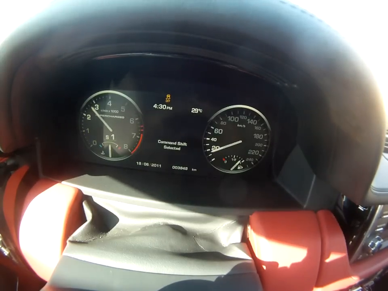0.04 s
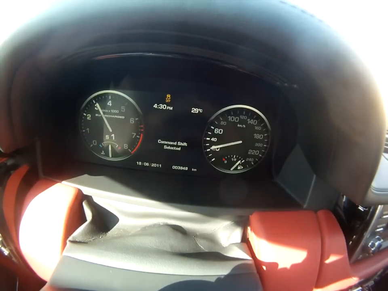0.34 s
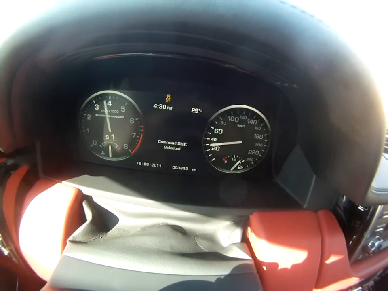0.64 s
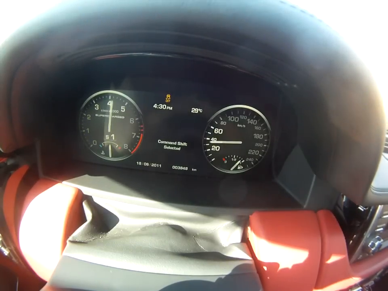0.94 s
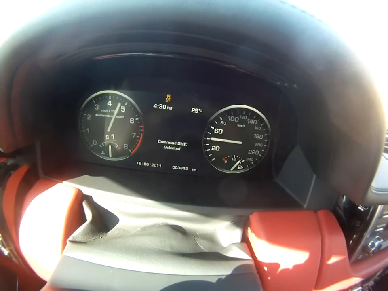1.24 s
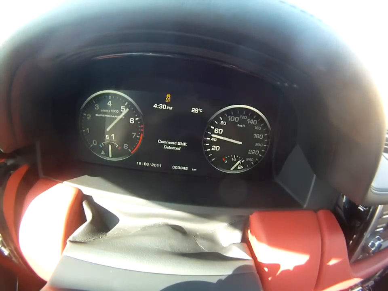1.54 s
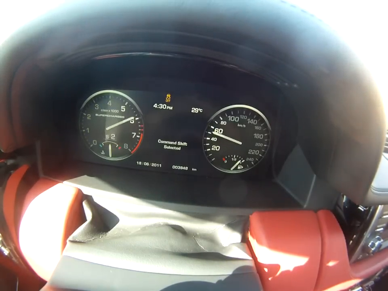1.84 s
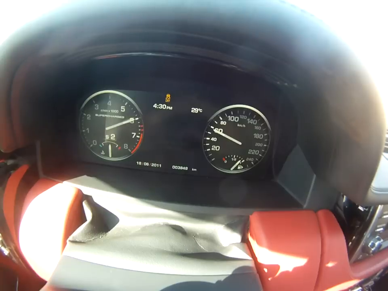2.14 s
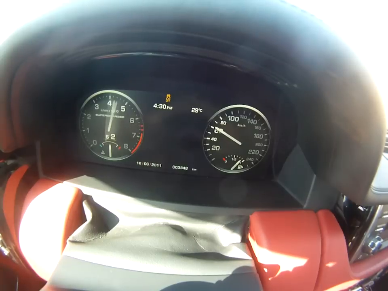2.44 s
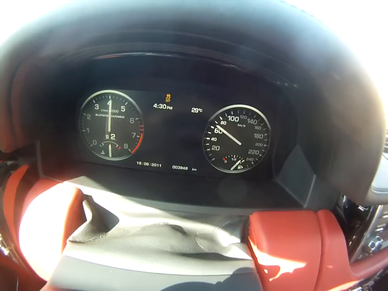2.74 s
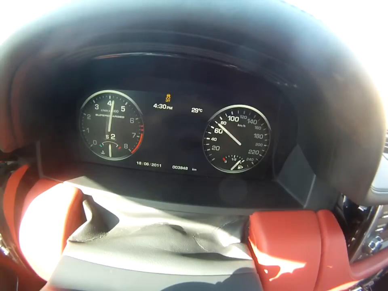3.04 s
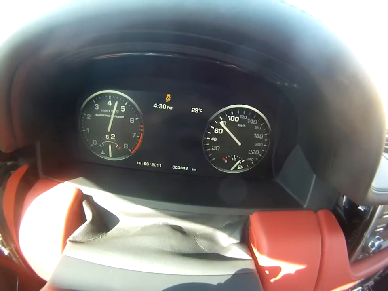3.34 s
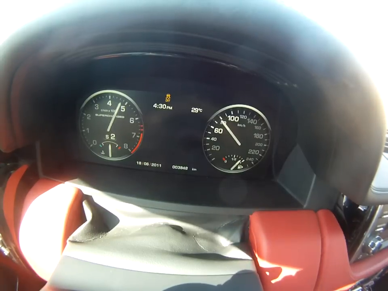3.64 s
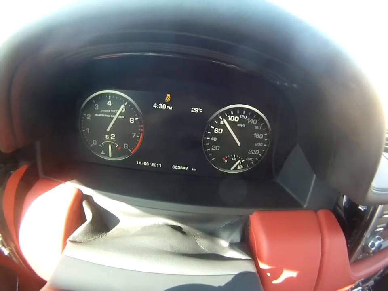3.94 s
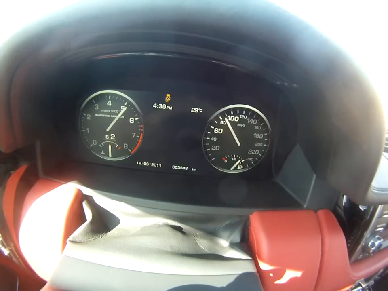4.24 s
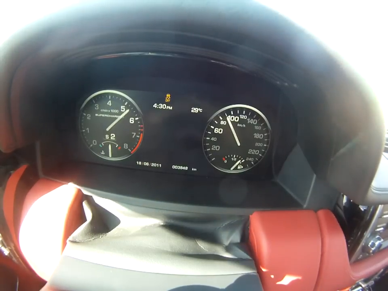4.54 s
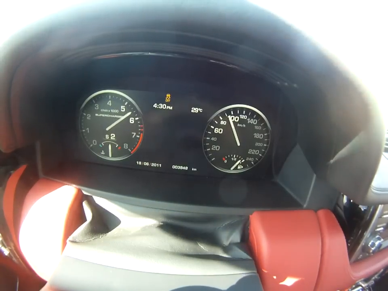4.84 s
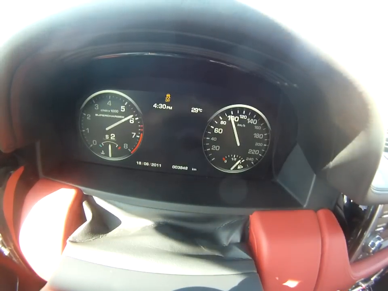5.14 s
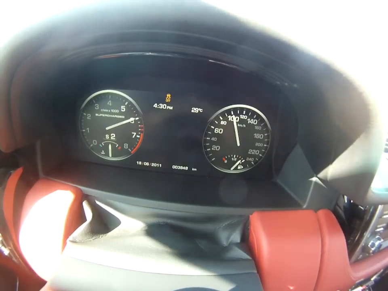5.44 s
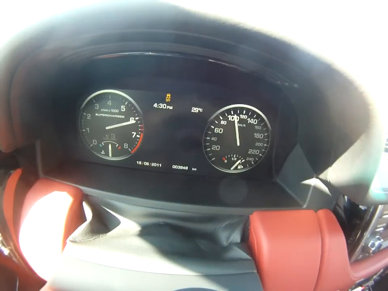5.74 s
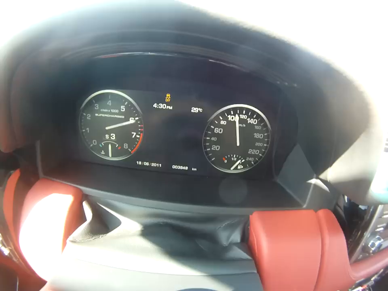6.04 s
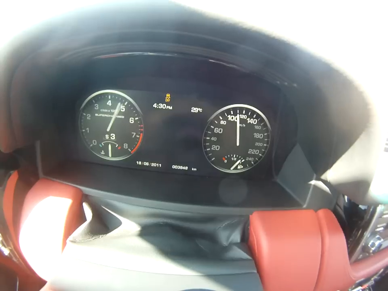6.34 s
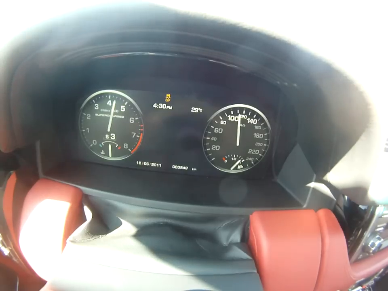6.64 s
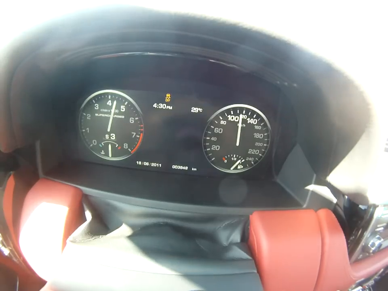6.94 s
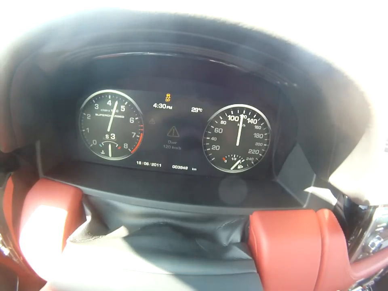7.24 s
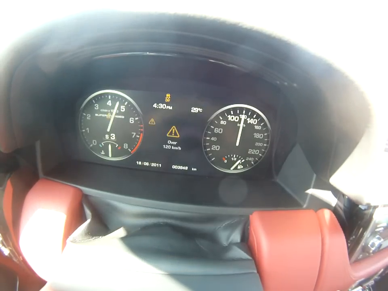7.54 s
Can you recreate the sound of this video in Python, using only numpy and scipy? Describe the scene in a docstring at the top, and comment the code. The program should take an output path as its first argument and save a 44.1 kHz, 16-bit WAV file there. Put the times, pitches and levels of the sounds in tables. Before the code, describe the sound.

A V8 car accelerates flat out through two upshifts, heard from the cabin over road rumble, rushing air and rattling trim.

```python
"""A V8 roars up through first, second and third gear, flat out, heard from the driver's seat.
Its orders (multiples of the four-stroke cycle rate) sweep through the cabin's resonances and howl,
over rushing air and road rumble. Trim rattles at the first upshift, the driveline thumps at the second,
and two bumps jolt the body near the end. A small camera's coarse sample clock adds a high sizzle."""
import sys
import numpy as np
from scipy import signal
from scipy.fft import rfft, irfft, next_fast_len
from scipy.io import wavfile
from scipy.ndimage import uniform_filter1d, map_coordinates

SR = 44100
rng = np.random.default_rng(int(sys.argv[2]) if len(sys.argv) > 2 else 0)


def store_pcm(level_fs):
    """Save levels as 16-bit WAV."""
    pcm = np.round(np.clip(level_fs, -1, 1) * 32767).astype(np.int16)
    wavfile.write(sys.argv[1], SR, np.atleast_2d(pcm).T)


N = 340011

# engine speed through three gears, in four-stroke cycles a second: time_s, cycle_hz
ENGINE_SPEED = [(0, 24.49), (.12, 25.43), (.5, 31.77), (1, 39.02), (1.5, 47.26), (1.75, 50.77),
                (1.95, 50.8), (2.22, 33.63), (2.32, 33), (3, 36.47), (4.4, 45.52), (5.62, 51.98),
                (5.86, 52.33), (6.15, 35.96), (6.5, 35.93), (7, 37.5), (7.71, 39.28)]
# the car gathering pace: time_s, speed_kmh
ROAD_SPEED = [(0, 38), (2, 39.5), (6, 98.7), (7.7, 128.5)]
# torque is held back and the car lurches: start_s, hold_s, torque_drop_db, drone_swell_db
UPSHIFT_DIPS = [(1.898, 0.25, 11.5, 7), (5.822, 0.4, 10, 2)]
# the firing note and two overtones, away from the cabin's modes: order, level_db
FIRING_ORDERS = [(8, -34), (16, -47.5), (20, -52)]
# uneven exhaust pulses favour some orders: order, gain_db
EXHAUST_PATTERN = [(2, 6.5), (3, 0.5), (4, 2.5), (5, 2.5), (6, -5), (7, -3.5), (9, -3), (10, 2), (11, 4),
                   (12, -0.5), (13, 4.5), (15, -0.5), (17, -1.5), (19, 4.5), (22, -1), (23, -1.5),
                   (24, 2.5), (25, -3.5), (27, 3.5), (28, 7), (29, 1.5), (30, 0.5), (31, -11.5), (32, 1),
                   (34, -2), (36, 6.5), (39, -4), (40, 3), (41, -1), (47, -5.5), (48, 0.5), (50, -11.5),
                   (53, -2), (55, -8.5), (56, 7)]
# tone of the path from engine to cabin: frequency_hz, gain_db
CABIN_PATH = [(60, -39), (100, -36), (130, -30), (150, -31.5), (175, -28.5), (200, -36), (245, -35),
              (285, -28.5), (320, -28.5), (350, -35.5), (400, -37), (500, -43), (565, -49.5), (630, -43.5),
              (700, -54), (780, -47), (850, -55), (1010, -57), (1230, -65.5), (1310, -63.5), (1430, -66),
              (1640, -61.5), (1920, -68), (2150, -68), (2650, -66.5), (3100, -73.5)]
# an order howls as it meets a cabin mode: order, mode_hz, width_hz, level_db
CABIN_HOWLS = [(5, 220, 36, -27.5), (6, 276, 12.16, -25), (6, 307, 9.1, -27), (7, 300, 36, -28),
               (8, 290, 26, -23), (8, 335, 11, -16), (8, 384, 13, -20), (8, 411, 12, -23),
               (9, 295, 27, -28), (10, 390, 15, -28), (12, 422.6, 24, -31), (12, 488, 21, -30),
               (12, 595, 14, -35), (13, 524.6, 27, -29.5), (13, 645, 19, -31.5), (14, 645, 26, -38),
               (15, 687, 55, -41.5), (15, 762, 18, -38.5), (16, 440, 150, -36.5), (16, 636, 33.3, -31.5),
               (18, 776, 36, -37), (20, 815, 90, -39), (20, 972, 24, -39), (20, 1020, 36, -36),
               (24, 880, 80, -42.5), (28, 1165, 30, -46)]
# swell and ebb of the cabin's boom: time_s, gain_db
BOOM_ENVELOPE = [(0.1, -22.9), (0.6, -20.1), (1.3, -21.2), (1.75, -18.5), (2.1, -28.1), (2.4, -23.6),
                 (3.1, -21.6), (3.5, -20.3), (3.75, -25.9), (4.3, -21.6), (4.8, -19.1), (5.5, -24.6),
                 (6.75, -26.7), (7.25, -21.3), (7.6, -25.6)]
# road roughness, felt as body shake: time_s, level_db
ROAD_ROUGHNESS = [(0, -28), (.4, -20), (1.6, -21), (2.6, -21), (3.3, -23), (4.4, -22.5), (5.3, -18.5),
                  (6, -23.5), (7.7, -22)]
# low-mid roar of rushing gas: frequency_hz, gain_db
ROAR_COLOUR = [(40, -120), (140, -8), (200, 0), (300, -2.5), (410, -4), (520, -9.5), (700, -18),
               (1000, -23.5), (1400, -38.5), (4000, -120)]
# bright rasp of rushing gas, also the trim's crunch: frequency_hz, gain_db
RASP_COLOUR = [(150, -120), (700, 2), (1100, 0), (1500, -1), (2100, -2), (2650, -2), (3300, -9.5),
               (3900, -10), (4600, -17.5), (5300, -19), (6000, -25.5)]
# sub-bass shake of the body: frequency_hz, gain_db
SHAKE_COLOUR = [(6, -52), (20, -11.5), (30, 4), (40, 11.5), (50, 3.5), (65, -8.5), (110, -54.5),
                (300, -120)]
# bass drone of tyres and driveline: frequency_hz, gain_db
DRONE_COLOUR = [(15, -120), (40, -23.5), (62, -5.5), (95, 3.5), (125, -3.5), (180, -17.5), (400, -40),
                (1500, -120)]
# narrow boom of the cabin air: frequency_hz, gain_db
BOOM_COLOUR = [(40, -120), (110, -30.5), (135, 3.5), (154, 11.5), (172, -18), (240, -46.5), (700, -120)]
# ring of plastic trim: frequency_hz, gain_db
TRIM_COLOUR = [(300, -120), (1100, -10.5), (2000, -1.5), (3000, 2), (4200, -1), (5200, -0.5), (6000, -8.5)]
# jolts through the body: start_s, swing_gain_db, pitch_hz, t60_s, crunch_gain_db
BODY_JOLTS = [(6.036, 0.5, 112.5, 0.044, -46), (7.598, -6.5, 75, .05, -39), (7.67, -7, 59, 0.069, -31)]
# loose trim ticking: start_s, gain_db
TRIM_TICKS = [(0.5626, -49.5), (0.617, -53), (0.7492, -45.5), (0.797, -46.5), (0.8607, -50), (0.9254, -47),
              (1.471, -51.5), (1.9563, -36.5), (1.965, -35), (2.037, -43), (2.767, -48), (3.0742, -50),
              (3.1138, -42), (3.54, -47), (3.909, -50), (3.9883, -46), (5.4622, -43), (6.0429, -46.5),
              (6.1769, -50), (6.252, -46.5), (7.671, -33.5)]

OPENING_DB, OPENING_S = 6.5, .35  # the throttle finishes opening at the start
BACK_OFF_S, PICK_UP_S = .074, .16  # torque ramps around each upshift
CUT_S, CUT_DB, CUT_FALL_S, CUT_RETURN_S = 6.043, 11, .015, .21  # hush as third gear engages
SCATTER_RAD, SHIFT_SCATTER_RAD = .022, .06  # combustion timing scatter, and the extra in an upshift
FADE_ORDER, FADE_DB_PER_ORDER = 36, .12  # the top orders dissolve into the rasp
BOOM_HZ, BOOM_WIDTH_HZ, BOOM_TONE_DB = 151.5, 39, -4  # cabin mode rung by the low orders
JUDDER_S, JUDDER_GAP_S, JUDDER_DB, JUDDER_LOSS_DB = 2.063, .0307, -42, 1.1  # a panel chatters and dies
MID_CYCLE_HZ, MID_KMH = 40, 60
HOLD_HZ, TOP_HZ = 12000, 15320  # sample clock, treble limit


def firing_notes(angle, uneven_db, swell_db, blur_rad):
    """Eight firings a cycle give the main note and two overtones, wavering in strength and timing."""
    cycle_hz, load_db = curves(ENGINE_SPEED)[0], torque_db()
    out = np.zeros(N)
    for order, db in FIRING_ORDERS:
        unsteady_db = uneven_db * wobble(35) + swell_db * order / 12 * wobble(12)
        strength = np.hypot(amp(db + throttle_db()), howl(order, cycle_hz))
        phase = order * (angle + blur_rad * wobble(30)) + rng.uniform(0, 2 * np.pi)
        out += strength * amp(load_db + unsteady_db) * np.sin(phase)
    return out


def exhaust(angle, low_db, growl_db, snarl_db, growl_db_per_octave, snarl_db_per_octave):
    """The other orders sweep through the cabin's resonances; growl and snarl grow with the revs."""
    cycle_hz, load_db = curves(ENGINE_SPEED)[0], torque_db()
    mid_db = growl_db + growl_db_per_octave * revs() + throttle_db()
    high_db = snarl_db + snarl_db_per_octave * revs() + throttle_db()
    boom = amp(curves(BOOM_ENVELOPE)[0] + BOOM_TONE_DB)
    scatter_rad = SCATTER_RAD + SHIFT_SCATTER_RAD * shifting()
    out = np.zeros(N)
    for order in np.setdiff1d(np.arange(2, 57), (8, 16, 20)):
        band_db = low_db if order < 8 else mid_db if order < 16 else high_db
        fade_db = FADE_DB_PER_ORDER * max(order - FADE_ORDER, 0)
        source_db = band_db + along(EXHAUST_PATTERN, order) - fade_db
        # modes crowd together higher up, so the upper orders come and go more deeply
        depth_db = min(1.5 + order / 7, 4)
        ripple_db = depth_db * np.minimum(cabin_ripple(cycle_hz, knots_per_octave=34), 1.2)
        path_db = along(CABIN_PATH, order * cycle_hz) + ripple_db
        strength = np.hypot(amp(source_db + path_db), howl(order, cycle_hz))
        if order < 8:
            strength = np.hypot(strength, boom * bell(order * cycle_hz, BOOM_HZ, BOOM_WIDTH_HZ))
        # combustion scatter blurs the high orders most
        phase = order * (angle + scatter_rad * wobble(30)) + rng.uniform(0, 2 * np.pi)
        out += strength * amp(load_db + 1.8 * wobble(22)) * np.sin(phase)
    return out


def cycle_angle():
    """Phase of the four-stroke cycle; the crank speed flutters a little."""
    cycle_hz = curves(ENGINE_SPEED)[0] * (1 + .0012 * wobble(30))
    return 2 * np.pi * np.cumsum(cycle_hz) / SR


def howl(order, cycle_hz):
    """Amplitude an order gains from the cabin modes it is crossing."""
    return sum(amp(db) * bell(order * cycle_hz, hz, width_hz)
               for howling_order, hz, width_hz, db in CABIN_HOWLS if howling_order == order)


def cabin_ripple(cycle_hz, knots_per_octave):
    """An order swells and fades as it glides across the cabin's many small modes."""
    octaves = np.log2(cycle_hz / cycle_hz.min())
    grid = np.linspace(0, octaves.max(), 800)
    ripple = map_coordinates(rng.standard_normal(200), [grid * knots_per_octave], mode="mirror")
    return np.interp(octaves, grid, ripple)


def throttle_db():
    """The engine swells as the throttle finishes opening."""
    return -OPENING_DB * np.clip(1 - np.arange(N) / SR / OPENING_S, 0, 1)


def torque_db():
    """Full load, ducking at each upshift."""
    return cut_db() - sum(db * dip(s, BACK_OFF_S, hold_s, PICK_UP_S) for s, hold_s, db, _ in UPSHIFT_DIPS)


def cut_db():
    """The abrupt hush as third gear engages."""
    return -CUT_DB * dip(CUT_S, CUT_FALL_S, CUT_FALL_S, CUT_RETURN_S)


def shifting():
    """1 during an upshift, 0 in gear."""
    return sum(dip(s, BACK_OFF_S, hold_s, PICK_UP_S) for s, hold_s, _, _ in UPSHIFT_DIPS)


def gas_rush(angle, roar_db, roar_revs_db, roar_pace_db, rasp_db, rasp_revs_db, rasp_pace_db):
    """Turbulent exhaust, intake and wind roar and rasp, growing with revs and road speed."""
    roar_gain = amp(roar_db + roar_revs_db * revs() + roar_pace_db * pace() + .66 * wobble(4.4))
    roar = roar_gain * noise(ROAR_COLOUR)
    rasp_gain = amp(rasp_db + rasp_revs_db * revs() + rasp_pace_db * pace() + .4 * wobble(6.7))
    rasp = rasp_gain * noise(RASP_COLOUR)
    pulsing = unit(1 + .12 * np.cos(angle) + .17 * np.cos(4 * angle))  # each cycle, each bank's firings
    return pulsing * amp(cut_db()) * (roar + rasp)


def road(drone_db, drone_pace_db, drone_revs_db, boom_db, uneven_db):
    """The road shakes the body, tyres and driveline drone and swell in each lurch, the cabin booms."""
    lurch_db = sum(db * dip(s, BACK_OFF_S, hold_s, PICK_UP_S) for s, hold_s, _, db in UPSHIFT_DIPS)
    rolling_db = drone_db + drone_pace_db * pace() + drone_revs_db * revs() + lurch_db
    shake_db = curves(ROAD_ROUGHNESS)[0] + uneven_db * wobble(3.6)
    shake = amp(shake_db) * even_noise(SHAKE_COLOUR, span_s=.24)
    drone = amp(rolling_db + uneven_db * wobble(5)) * even_noise(DRONE_COLOUR, span_s=.13)
    boom = amp(boom_db + curves(BOOM_ENVELOPE)[0]) * even_noise(BOOM_COLOUR, span_s=.076)
    return shake + drone + boom


def thumps():
    """A gear engaging or a bump in the road gives the body a short low swing and crunches the trim."""
    t = np.arange(SR // 4) / SR
    swing, crunch = np.zeros(N), np.zeros(N)
    for s, swing_db, hz, t60_s, crunch_db in BODY_JOLTS:
        jolt = amp(-60 * t / t60_s) * (1 - np.exp(-t / .0043))
        add(swing, s, amp(swing_db + 6) * jolt * np.sin(2 * np.pi * hz * t))
        add(crunch, s, amp(crunch_db + 6.5) * jolt)
    return swing + crunch * noise(RASP_COLOUR)


def rattles(t60_s, bounce_s, bounce_db, judder_ticks):
    """Plastic trim ticks and bounces once; after the first upshift a panel judders in a fading run."""
    t, blows = np.arange(SR // 10) / SR, np.zeros(N)
    judder = [(JUDDER_S + k * JUDDER_GAP_S, JUDDER_DB - k * JUDDER_LOSS_DB) for k in range(judder_ticks)]
    for s, db in TRIM_TICKS + judder:
        tick = amp(db + 7 - 60 * t / t60_s) * (1 - np.exp(-t / .0008))
        add(blows, s, tick)
        add(blows, s + bounce_s * rng.uniform(.63, 1.1), tick * amp(bounce_db))
    return blows * noise(TRIM_COLOUR)


def trim_chatter(level_db, spread_db, t60_s):
    """Faint trim ticks between the loud ones, thickest while the car surges in first gear."""
    t, blows = np.arange(SR // 20) / SR, np.zeros(N)
    starts_s = np.r_[rng.uniform(.5, .95, 14), rng.uniform(1, 1.8, 10), rng.uniform(1.8, 7.6, 26)]
    for s in starts_s:
        tick_db = level_db + spread_db * rng.uniform(-1, 1)
        add(blows, s, amp(tick_db - 60 * t / t60_s))
    return blows * noise(TRIM_COLOUR)


def revs():
    """Engine speed in octaves above MID_CYCLE_HZ."""
    return np.log2(curves(ENGINE_SPEED)[0] / MID_CYCLE_HZ)


def pace():
    """Road speed above MID_KMH, as a share of it."""
    return curves(ROAD_SPEED)[0] / MID_KMH - 1


def dip(start_s, attack_s, hold_s, release_s):
    """Ducking envelope, 0 to 1 and back; the release begins hold_s after the start."""
    t = np.arange(N) / SR - start_s
    return np.clip(np.minimum(t / attack_s, 1 - (t - hold_s) / release_s), 0, 1)


def bell(hz, centre_hz, width_hz):
    """Gain of a resonance, its width taken at half power."""
    return 2 ** (-2 * ((hz - centre_hz) / width_hz) ** 2)


def amp(db):
    """Decibels to gain."""
    return 10 ** (np.asarray(db) / 20)


def unit(x):
    """Scale to rms 1."""
    return x / np.sqrt(np.mean(x ** 2) + 1e-20)


def along(points, position):
    """Read a curve on a log axis of frequency or order."""
    positions, values = np.transpose(points)
    return np.interp(np.log(position + 1), np.log(positions + 1), values)


def curves(rows):
    """Automation: one value per sample for each column after the time."""
    times_s, *columns = np.transpose(rows)
    return [np.interp(np.arange(N) / SR, times_s, column) for column in columns]


def wobble(rate_hz):
    """Smooth random drift, rate_hz knots a second."""
    coarse = np.arange(0, N + 64, 64)
    knots = rng.standard_normal(int(N * rate_hz / SR) + 4)
    return np.interp(np.arange(N), coarse, map_coordinates(knots, [coarse * rate_hz / SR]))


def filtered(x, response):
    """Equalise x with a gain that is a function of frequency."""
    size = next_fast_len(N + SR // 2)
    return irfft(rfft(x, size) * response(np.fft.rfftfreq(size, 1 / SR)), size)[:N]


def noise(colour):
    """Coloured noise of rms 1."""
    return unit(filtered(rng.standard_normal(N), lambda hz: amp(along(colour, hz))))


def even_noise(colour, span_s):
    """Coloured noise whose power holds steady over span_s."""
    x = noise(colour)
    power = np.abs(uniform_filter1d(x ** 2, int(span_s * SR) + 1))
    return x / np.sqrt(power + 1e-3)


def add(track, start_s, sound):
    """Mix a short sound into the track."""
    part = track[max(round(start_s * SR), 0):][:len(sound)]
    part += sound[:len(part)]


def scene():
    """The mono mix at the dashboard."""
    angle = cycle_angle()
    notes = firing_notes(angle, uneven_db=1.32, swell_db=1.5, blur_rad=.008)
    orders = exhaust(angle, low_db=0, growl_db=-.5, snarl_db=2,
                     growl_db_per_octave=6, snarl_db_per_octave=6.5)
    rush = gas_rush(angle, roar_db=-28.5, roar_revs_db=4, roar_pace_db=2,
                    rasp_db=-49.5, rasp_revs_db=6, rasp_pace_db=5)
    rumble = road(drone_db=-27, drone_pace_db=4, drone_revs_db=4, boom_db=-1.5, uneven_db=.77)
    trim = rattles(t60_s=.017, bounce_s=.01, bounce_db=-14, judder_ticks=7)
    chatter = trim_chatter(level_db=-52.5, spread_db=3.5, t60_s=.02)
    return (notes + orders + rush + rumble + trim + chatter + thumps())[None]


def record(dry):
    """Sizzle: the camera holds each coarse sample, mirroring the sound faintly around its clock rate."""
    soft_ends = signal.windows.tukey(N, .008 * SR / N)
    window = ("kaiser", 9)
    coarse = signal.resample_poly(dry[0] * soft_ends, HOLD_HZ, SR, window=window)
    held = signal.resample_poly(np.repeat(coarse, 4), SR, 4 * HOLD_HZ, window=window)[:N]
    return filtered(held, lambda hz: hz < TOP_HZ)[None]


dry = scene()
out = record(dry)
store_pcm(out)
```